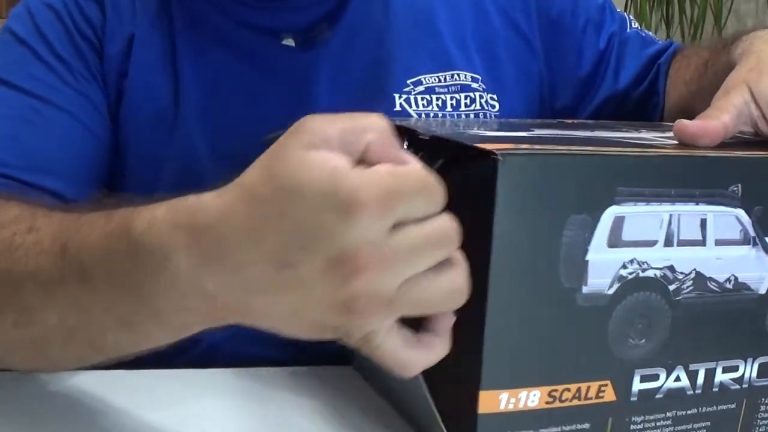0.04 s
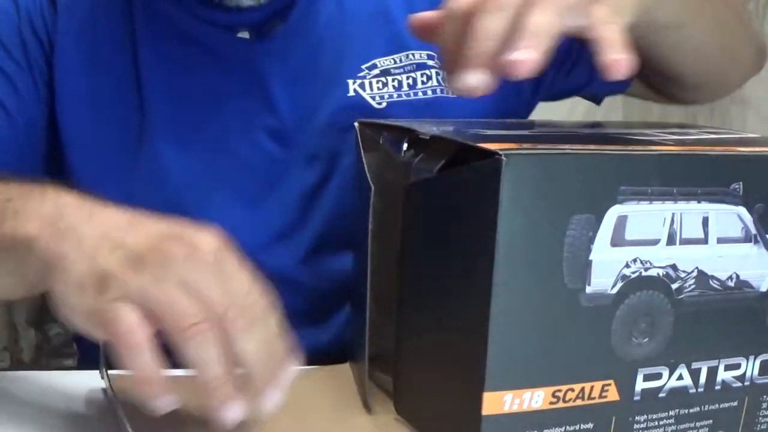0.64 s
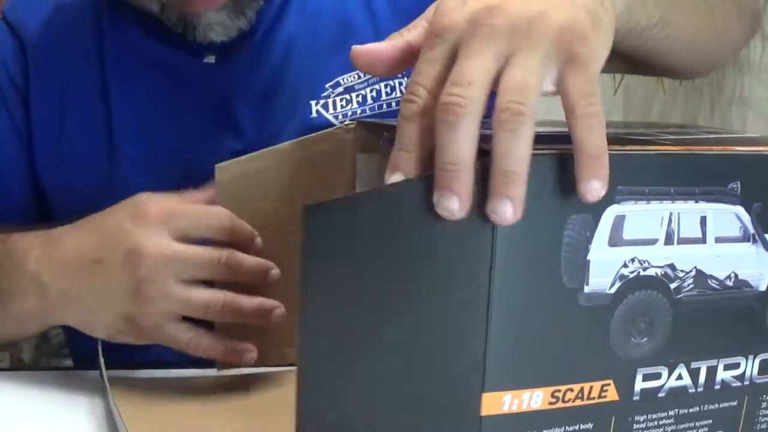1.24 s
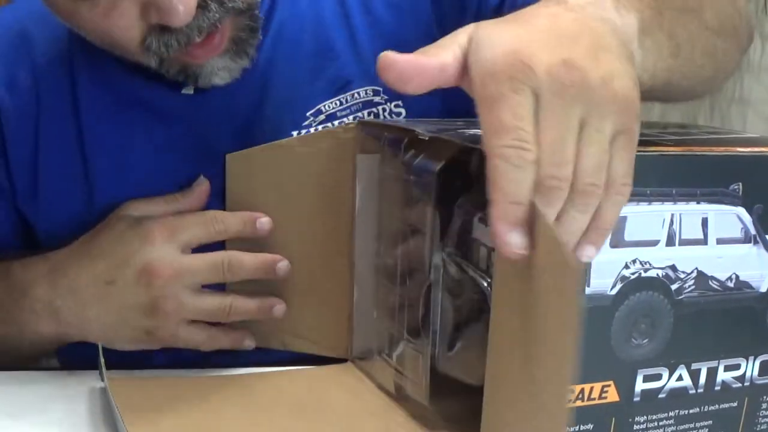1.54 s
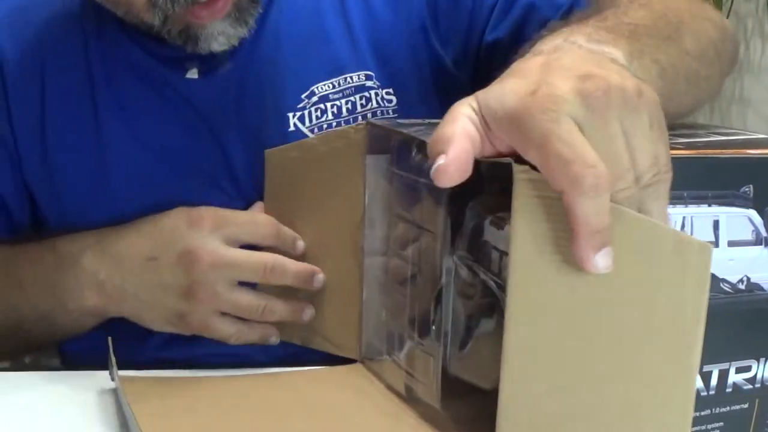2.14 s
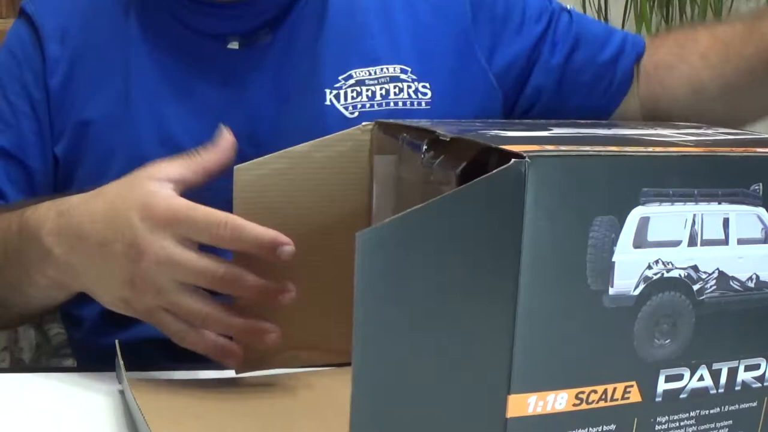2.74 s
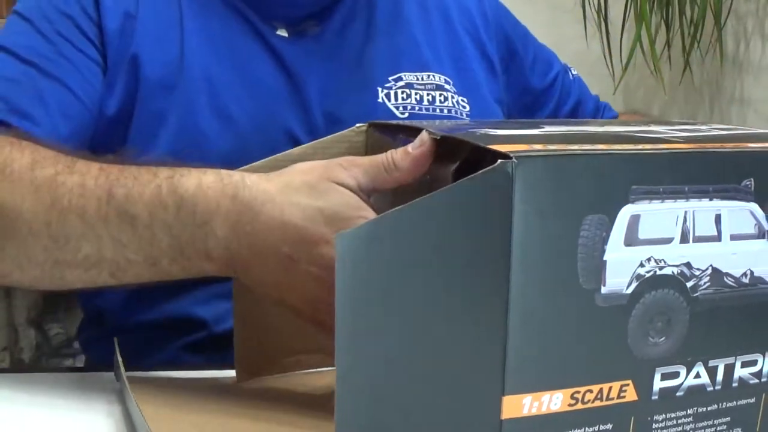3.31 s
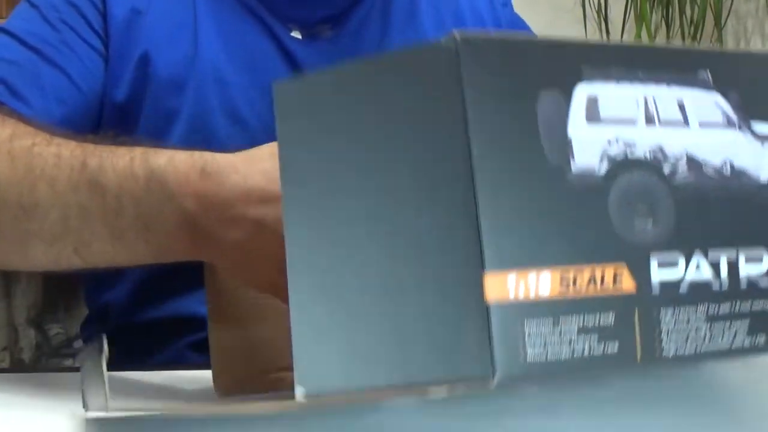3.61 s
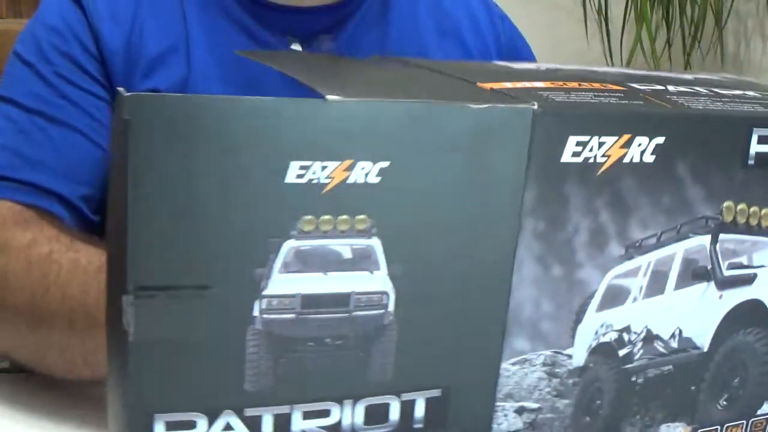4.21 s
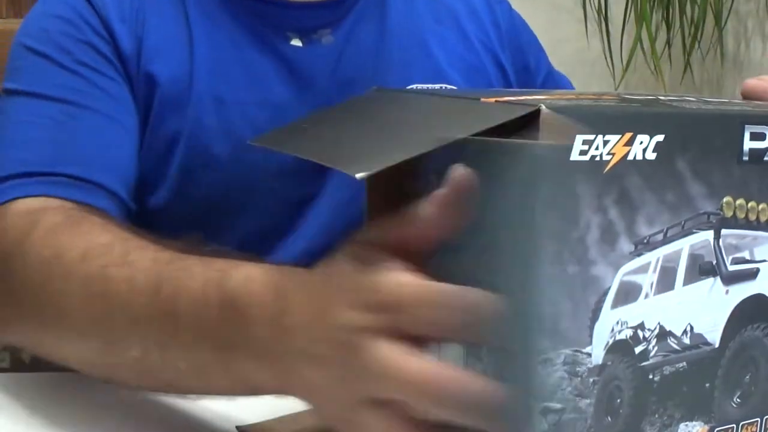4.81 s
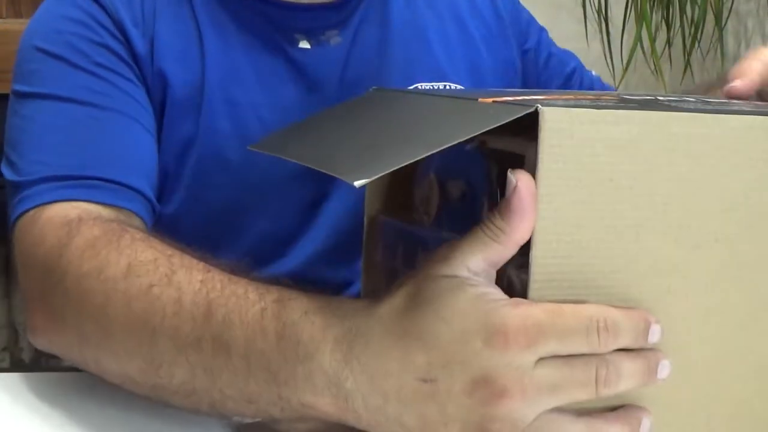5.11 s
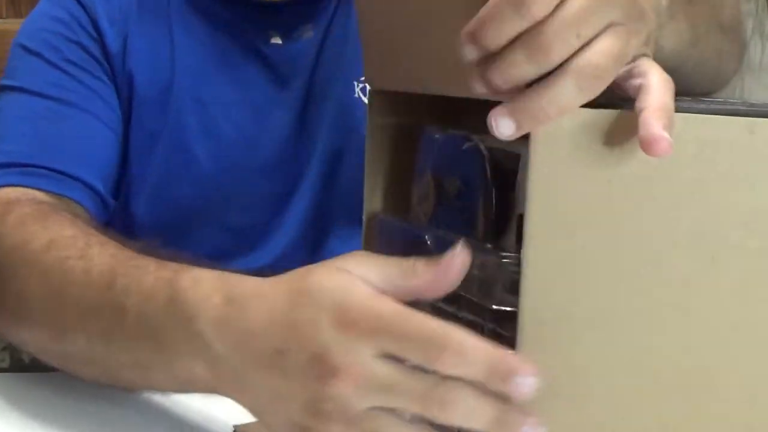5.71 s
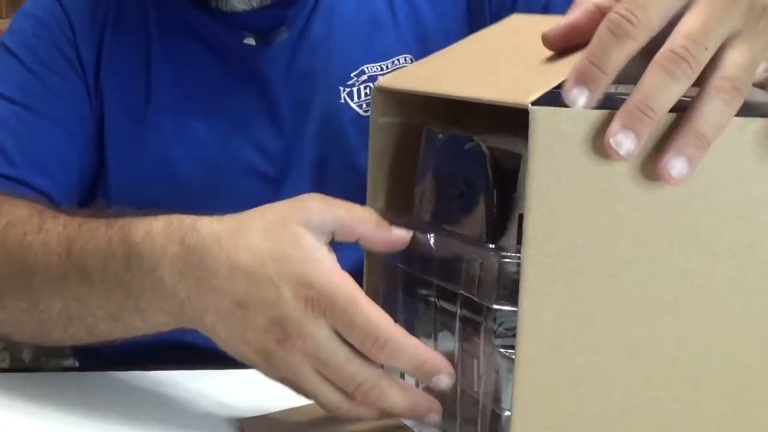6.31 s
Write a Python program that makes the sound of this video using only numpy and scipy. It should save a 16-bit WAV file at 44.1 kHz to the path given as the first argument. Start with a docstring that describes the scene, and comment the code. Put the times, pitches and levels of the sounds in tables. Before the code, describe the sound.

A cardboard box with a thin plastic tray inside is handled close to the microphone. It starts with a quick scrape of card and three sharp plastic snaps. A flap rasps and squeaks at about 0.4 seconds, and a hollow thump comes at 0.8, trailed by smaller bumps. From 1.3 to 3 seconds it is quieter, with hands sliding over card, light taps and a few clicks. A sharp knock lands at 3.1 seconds, then a squeaky scrape at 3.8 and scattered bumps as the box is turned. At 4.7 it hits the table with the loudest knock, followed by a hissing, squealing scrape until 5 seconds. Another flap rasps around 5.3. Bright plastic snaps stand out at 5.6 and 6.1, among soft knocks and rubbing. The room is small, with a short reverberation, faint air and a low steady hum.

```python
"""A quick scrape of card and a few sharp plastic snaps sound close by, over faint air and mains hum.
A cardboard box with a plastic tray inside is being opened and turned over on a table in a small room.
Friction makes the flaps rasp and squeal and the sliding skin hiss; bumps of the hands excite the
panels' damped modes, and the thin tray buckles in clicks. Near echoes and a short reverberation follow."""
import sys
import numpy as np
from scipy import signal
from scipy.fft import rfft, irfft, next_fast_len
from scipy.io import wavfile
from scipy.ndimage import map_coordinates

SR = 44100
rng = np.random.default_rng(int(sys.argv[2]) if len(sys.argv) > 2 else 0)


def transcribe(u):
    """Save the signal u as a 16-bit wav file named by the first command-line argument.

    u: samples, shape (n,) or (channels, n), limited to [-1, 1]; the rate is SR.
    q: integer samples, one column per channel.
    """
    v = np.clip(np.atleast_2d(u).T, -1, 1)
    q = np.round(v * 32767).astype(np.int16)
    wavfile.write(sys.argv[1], SR, q)


N = 280035
T = np.arange(N) / SR


def from_db(db):
    """Decibels to amplitude ratio."""
    return 10 ** (np.asarray(db) / 20)


def rms_one(x):
    """Normalisation to unit rms."""
    return x / np.sqrt(np.mean(x ** 2) + 1e-20)


def at_hz(points, hz):
    """Interpolation of a table on a log-frequency axis."""
    f, value = np.transpose(points)
    return np.interp(np.log(np.maximum(hz, 1)), np.log(f), value)


def colour(x, points, share=1):
    """Zero-phase filtering by rows of frequency_hz, gain_db; share scales the decibels."""
    size = next_fast_len(x.shape[-1] + SR // 10)
    hz = np.arange(size // 2 + 1) * SR / size
    return irfft(rfft(x, size) * from_db(share * at_hz(points, hz)), size)[..., :x.shape[-1]]


def band(x, low_hz, high_hz, order=2):
    """Causal band-pass filtering."""
    sos = signal.butter(order, [low_hz, min(high_hz, .45 * SR)], "band", fs=SR, output="sos")
    return signal.sosfilt(sos, x)


def add(track, start_s, sound):
    """Superposition of a sound on a track."""
    i = max(round(start_s * SR), 0)
    track[i:i + len(sound)] += sound[:N - i]


def fade(t, t60):
    """Exponential decay, 60 dB in t60 seconds."""
    return from_db(-60 * t / t60)


def drift(rate_hz, size):
    """Slow random modulation, bounded by -2 and 2."""
    return np.interp(T[:size] * rate_hz, np.arange(N // 100), 2 * np.tanh(rng.standard_normal(N // 100) / 2))


def stroke(t, length_s, rise_share, hold_share=0.3062):
    """Trapezoidal speed, 0-1; rise_share divides the time off top speed between rise and fall."""
    rise = np.clip(rise_share, .01, .99)
    shares = [0, rise * (1 - hold_share), hold_share, (1 - rise) * (1 - hold_share)]
    return np.interp(t, length_s * np.cumsum(shares), [0, 1, 1, 0])


def friction(size, grains_per_s, grain_share, judder_db, judder_hz):
    """Sliding friction: fibres catch and release in many tiny and a few large slips, pressed unevenly."""
    slips = (rng.random(size) < grains_per_s / SR) * rng.laplace(0, 1, size)
    force = np.sqrt(grain_share) * rms_one(slips) + np.sqrt(1 - grain_share) * rng.standard_normal(size)
    return rms_one(force * from_db(judder_db * drift(judder_hz, size)))


# spectrum of the still air: frequency_hz, gain_db
AIR_SPECTRUM = [(15, -55), (25, -10), (55, -6), (123, 3), (285, 1.5), (818, -12.5), (1520, -13.5),
                (3920, -19), (14800, -27.5), (16000, -39)]

def still_air(level_db=-52.5):
    """Ambient noise: a steady random signal, strongest in the low register."""
    return from_db(level_db) * rms_one(colour(rng.standard_normal(N), AIR_SPECTRUM))


def mains_hum(pitch_hz=120.5, rms_db=-59):
    """Simple harmonic motion: the mains give one steady, low tone."""
    return from_db(rms_db) * np.sqrt(2) * np.sin(2 * np.pi * pitch_hz * T)


# normal modes of the box: pitch_hz, level_db, t60_s
BOX_MODES = [(126.5, -15, 0.3), (172, -11, 0.12), (217, 6.5, 0.14), (264, 2.5, 0.2), (330, -4.5, 0.22),
             (407, 0, 0.068), (585, -1, 0.24), (600, 3, 0.12), (874, -1.5, 0.11), (976, 2.5, 0.017),
             (1185, 1.5, 0.01), (1454, -8.5, 0.11), (1850, 14, 0.0051), (2040, -1.5, 0.02)]

def box_ring(spread_db, detune=0.044):
    """Modal impulse response, peak 1: each contact point weights the modes and each grip shifts them."""
    hz, db, t60 = np.transpose(BOX_MODES)[:, :, None]
    t = T[:SR // 5]
    hz = hz * (1 + detune * rng.standard_normal(hz.shape))
    strength = from_db(db + spread_db * rng.standard_normal(hz.shape)) * rng.choice([-1, 1], hz.shape)
    ring = np.sum(strength * np.sin(2 * np.pi * hz * t) * fade(t, t60), axis=0)
    return ring / np.abs(ring).max()


# spectrum of an edge or skin sliding on card: frequency_hz, gain_db
HISS_SPECTRUM = [(300, -7.5), (900, -2), (2000, -2), (4200, -1.5), (5800, -2), (7500, 1.5), (9300, 3),
                 (11500, -6.5), (13500, -12.5), (16000, -18)]
# close modes of the card around a scraping edge: pitch_ratio, level_db
FLAP_MODES = [(.8, -4), (1.0, 0), (1.17, -2)]
# flaps on card and table: start_s, length_s, rise_share, pitch_hz, rasp_db, hiss_db, box_db, treble_db
FLAP_SCRAPES = [(0.0, 0.0583, 0, 2470, -45, -21.5, -32.5, 0), (0.038, 0.11, 0.09, 2390, -46, -56, -49, 0),
                (0.33, 0.23, 0.2, 2550, -45.5, -47, -42, 0),
                (0.37, 0.037, 0.41, 2600, -35, -29.5, -33.5, 4),
                (0.524, 0.11, 0.63, 2730, -40, -43, -43.5, 3), (0.917, 0.1, 0.07, 1070, -44, -50, -49, -2),
                (1.239, 0.11, 0.34, 980, -54, -48.5, -53, 8),
                (2.426, 0.06, 0.94, 2410, -40.5, -38.5, -35.5, 9),
                (3.096, 0.075, 0.56, 2750, -42.5, -43, -38.5, -2),
                (3.212, 0.048, 0.32, 2920, -41.5, -49, -52, -8),
                (3.348, 0.064, 0.1, 2900, -51, -42, -43, 2), (3.625, 0.058, 0.36, 2730, -54, -44, -50, -5),
                (3.776, 0.12, 0.02, 2900, -38.5, -41.5, -40, -3),
                (3.823, 0.15, .33, 2830, -35, -34, -45, -12),
                (4.675, 0.085, 0.03, 2790, -33.5, -35.5, -30.5, -1),
                (4.773, 0.22, 0.12, 2790, -37.5, -27.5, -40, 4),
                (4.789, 0.21, 0.51, 3200, -33, -24, -35, 0),
                (4.934, 0.078, 0.62, 2830, -31, -25, -32.5, -1),
                (5.312, 0.16, .25, 1930, -37.5, -38, -41, 0), (5.452, 0.11, 0.34, 2100, -40, -35, -53, -4),
                (5.561, 0.08, 0.01, 2200, -34.5, -38.5, -34, -3)]

def flap_scrapes(ribs_per_s=310, rib_depth=.55, slow_pitch_drop=.14, mode_ratio=1.08, skirt_ratio=1.65):
    """Forced vibration: one friction force hisses at the edge and drives the modes of flap and box."""
    out, t = np.zeros(N), T[:SR // 2]
    for start_s, length_s, rise_share, hz, rasp_db, hiss_db, box_db, treble_db in FLAP_SCRAPES:
        speed = stroke(t, length_s, rise_share)
        force = friction(len(t), grains_per_s=8300, grain_share=0.13, judder_db=1.07, judder_hz=87.6)
        ribs_crossed = np.cumsum(ribs_per_s * speed * (1 + .5 * drift(203.4, len(t)))) / SR
        force *= 1 + rib_depth * speed * np.cos(2 * np.pi * ribs_crossed)
        modes = 0
        for ratio, db in FLAP_MODES:
            mode = band(force, hz * ratio / mode_ratio, hz * ratio * mode_ratio, order=1)
            modes += from_db(db + 4 * drift(89.7, len(t))) * mode   # the edge feeds each mode unevenly
        rasp = rms_one(band(modes + from_db(-15) * force, hz / skirt_ratio, hz * skirt_ratio))
        glide = 1 - slow_pitch_drop * (1 - speed)   # a slower edge rasps lower
        rasp = from_db(rasp_db) * map_coordinates(rasp, [np.cumsum(glide)], order=3)
        hiss = colour(colour(force, HISS_SPECTRUM), [(9500, 0), (13000, treble_db)])
        held_ring = box_ring(spread_db=1.5) * fade(T[:SR // 5], t60=0.035)   # damped by the hand
        box = band(signal.fftconvolve(force, held_ring)[:len(t)], low_hz=515, high_hz=4830, order=1)
        scrape = rasp + from_db(hiss_db) * rms_one(hiss) + from_db(box_db) * rms_one(box)
        add(out, start_s, speed * scrape)
    return out


# spectra of the panels' rumble and the card's rustle: frequency_hz, gain_db
RUMBLE_SPECTRUM = [(25, -38), (55, -9), (100, -9), (190, 1.5), (270, 7.5), (450, -4), (700, -5),
                   (1200, -9.5), (3000, -67)]
RUSTLE_SPECTRUM = [(400, -1.5), (800, 3), (1300, -1), (2000, 1.5), (3300, -1), (5000, -11), (8000, -38)]
# hands sliding on the box: start_s, length_s, panel_db, skin_db
HAND_RUBS = [(0.004, 0.16, -37.5, -41), (0.153, 0.13, -42, -45), (0.254, 0.23, -49, -48.5),
             (0.881, 0.16, -33, -51), (0.984, 0.49, -47, -54), (1.306, 0.45, -72, -48),
             (1.576, 0.18, -46, -53), (1.852, 0.34, -52, -45.5), (2.026, 0.15, -42, -48),
             (2.103, 0.25, -47, -42.5), (2.324, 0.18, -44, -50), (3.156, 0.56, -42.5, -56),
             (3.464, 0.14, -72, -46.5), (3.544, 0.63, -44, -64), (3.91, 0.22, -46, -49),
             (4.072, 0.12, -34.5, -44.5), (4.107, 0.45, -46, -47.5), (4.373, 0.098, -33.5, -51),
             (4.461, 0.21, -39, -50.5), (4.677, .1, -29.5, -50), (4.955, 0.19, -43.5, -41),
             (5.032, 0.31, -53.5, -47.5), (5.52, 0.18, -39, -39.5), (5.633, 0.26, -42, -44.5),
             (5.844, .24, -39.5, -43.5), (6.042, 0.13, -41, -36.5), (6.086, 0.5, -48.5, -43.5)]

def hand_rubs():
    """Friction noise grows with sliding speed: panels rumble, card rustles and skin hisses on the print."""
    gains = np.zeros((3, N))
    for start_s, length_s, panel_db, skin_db in HAND_RUBS:
        speed = stroke(T - start_s, length_s, rise_share=0.33, hold_share=0.27)
        card_db = skin_db + 0.36 * (panel_db - skin_db)
        gains += np.outer(from_db([panel_db + 1.5, card_db - 1.5, skin_db]), speed)
    rumble = friction(N, grains_per_s=160, grain_share=0.4, judder_db=4, judder_hz=45)
    rustle = friction(N, grains_per_s=570, grain_share=0.14, judder_db=6, judder_hz=100)
    hiss = friction(N, grains_per_s=1100, grain_share=0.15, judder_db=2, judder_hz=140)
    layers = colour(rumble, RUMBLE_SPECTRUM), colour(rustle, RUSTLE_SPECTRUM), colour(hiss, HISS_SPECTRUM)
    return sum(gain * rms_one(layer) for gain, layer in zip(gains, layers))


# sharp snaps of the plastic tray, and cracks as the box is knocked: start_s, level_db, centre_hz
SNAPS_AND_CRACKS = [(0.019, -8, 9000), (0.031, -14, 8370), (0.062, -11.5, 9700), (0.4937, -17.5, 11000),
                    (0.512, -18, 2510), (0.8055, -21, 7100), (0.816, -24, 6250), (1.098, -23, 8500),
                    (2.074, -20, 8160), (2.312, -27.5, 7240), (2.346, -26, 5040), (3.143, -23, 9500),
                    (3.1502, -8, 1160), (4.670, -6.5, 1680), (4.697, -22, 2970), (4.709, -12, 3300),
                    (3.215, -26, 3300), (3.236, -22, 2700), (3.244, -26, 3200), (3.429, -23.5, 9400),
                    (4.965, -18, 6800), (4.974, -10, 9500), (5.5698, -4, 9800), (5.5703, -8.5, 2130),
                    (5.577, -4.5, 9000), (5.675, -22, 2930), (5.798, -24, 3420), (6.073, -17, 8000),
                    (6.1041, -6.5, 9300)]

def snaps_and_cracks(jolt_hz=5500, band_ratio=1.56, gain_db=-8):
    """Transients: a snap or crack excites dense modes that die fast. Each knock also makes the tray tick."""
    out, t = np.zeros(N), T[:SR // 10]
    jolts = [(start_s, tick_db, jolt_hz) for start_s, _, _, _, tick_db, _ in BOX_KNOCKS]
    envelope = fade(t, t60=0.0028) + from_db(-8) * fade(t, t60=0.044)   # the click, then a brief ring
    for start_s, db, hz in SNAPS_AND_CRACKS + jolts:
        force = rng.standard_normal(len(t))
        burst = rms_one(band(force, hz / band_ratio, hz * band_ratio)) + from_db(-13) * force
        add(out, start_s, from_db(db + gain_db) * burst * envelope)
    return band(out, low_hz=510, high_hz=12300)


# blows on the box: start_s, thump_db, pitch_hz, clack_db, tick_db, damping_t60_s
BOX_KNOCKS = [(0.059, -21, 190, -31, -30, 0.094), (0.776, -17.5, 212, -25, -24.5, 0.2),
              (0.806, -8.5, 208.4, -16.5, -18.5, 0.091), (0.845, -22, 215, -27, -29, 0.078),
              (0.924, -18.5, 290, -21, -26, 0.037), (1.031, -24, 314, -19.5, -22.5, 0.038),
              (1.044, -22.5, 303, -46, -42, 0.084), (1.073, -32, 262, -36, -25.5, 0.065),
              (1.098, -29, 277, -25.5, -30, .06), (1.176, -39, 302, -28.5, -28, .06),
              (1.267, -43, 274, -33, -35, 0.086), (1.996, -28, 340, -28, -33, 0.047),
              (2.043, -25, 390, -30, -32, 0.064), (2.052, -23.5, 440, -25.5, -40, 0.027),
              (2.089, -38, 423, -23.5, -35, 0.052), (2.358, -35, 398, -34, -40, 0.056),
              (2.391, -30, 407, -37, -44, 0.064), (2.405, -35, 363, -27, -41, 0.045),
              (2.481, -38, 330, -23, -28, 0.086), (3.094, -33.5, 236, -35, -33, 0.083),
              (3.1499, -13.5, 286.6, -12.5, -20, 0.074), (3.273, -28.5, 310, -33, -46, 0.06),
              (3.424, -28.5, 276, -31, -31, 0.068), (3.624, -22, 291, -31, -43, 0.045),
              (3.78, -24, 246, -27, -24, 0.22), (3.988, -19, 255, -36, -39, 0.047),
              (4.071, -26, 246, -33, -28, 0.096), (4.100, -25, 247, -21, -19, 0.15),
              (4.409, -25, 238, -24, -27, 0.11), (4.538, -24.5, 283, -29, -26.5, 0.084),
              (4.566, -20, 220, -52, -45, 0.063), (4.668, -9.5, 251, -15, -21, 0.091),
              (4.674, -9.5, 326, -9, -20, 0.092), (4.706, -19.5, 246, -17, -23, 0.074),
              (5.027, -25, 260, -29, -27, 0.084), (5.529, -27.5, 218, -45, -33, 0.067),
              (5.570, -37, 260, -40, -37, 0.048), (5.586, -19.5, 221, -21, -20, 0.16),
              (5.847, -28.5, 292, -29, -22, 0.068), (5.908, -26.5, 292, -49, -35, 0.13),
              (5.931, -23.5, 275, -25, -37, 0.22), (5.949, -21.5, 263, -21, -23, 0.12),
              (6.069, -26, 191, -36, -29, 0.18), (6.117, -36, 199, -20, -30, 0.073),
              (6.34, -31.5, 302, -25, -25, 0.11)]

def box_knocks(panel_t60=0.16, give_s=0.0006):
    """Impact excitation: the contact cracks like paper; panel and box ring until the hand damps them."""
    out, t = np.zeros(N), T[:SR // 5]
    panel_modes = [(1, 0), (1.85, -8), (2.9, -13)]   # pitch_ratio, level_db
    for start_s, thump_db, hz, clack_db, _, damping_t60 in BOX_KNOCKS:
        modes = sum(from_db(db) * np.sin(2 * np.pi * hz * ratio * t) for ratio, db in panel_modes)
        panel = modes * fade(t, panel_t60) * (1 - np.exp(-t / give_s))
        fibres = friction(len(t), grains_per_s=1900, grain_share=0.3, judder_db=5.5, judder_hz=100)
        crack = rms_one(band(fibres, low_hz=690, high_hz=2200)) * fade(t, t60=0.024)
        ring = from_db(thump_db) * panel + from_db(clack_db - 1) * box_ring(spread_db=5, detune=0.039)
        add(out, start_s, ring * fade(t, damping_t60) + from_db(clack_db - 7) * crack)
    return band(out, low_hz=131, high_hz=11800)   # light panels radiate little bass


# squealing card edges: start_s, length_s, rise_share, pitch_hz, glide_hz_per_s, width_hz, level_db
EDGE_SQUEALS = [(0.373, 0.03, 0.36, 2460, 2000, 480, -26.5), (0.376, 0.016, 0.2, 3350, 2000, 260, -30),
                (0.373, 0.038, 0.04, 7650, 0, 1100, -29), (0.553, 0.063, 0.86, 2800, 4008, 400, -42.5),
                (0.584, 0.042, 0.5, 2380, 5020, 230, -38), (3.228, 0.032, 0.4, 2084, 0, 300, -44),
                (3.839, 0.11, 0.11, 2360, -2000, 516, -33), (3.839, 0.11, 0.05, 3200, -2, 710, -37),
                (3.825, .11, 0.6, 12300, 0, 1400, -44), (4.796, 0.19, 0.12, 2325, -1000, 600, -31.5),
                (4.80, 0.16, 0.4, 13500, 2, 1600, -36), (4.833, 0.084, .5, 3800, 0.5, 1200, -29),
                (4.873, 0.1, 0.44, 575, -3, 89.5, -34), (4.94, .075, 0.4, 1080, 0, 350, -35),
                (5.308, 0.14, 0.45, 1993, -500, 650, -37.5), (5.335, 0.078, 0.4, 855, -1000, 395, -40.5),
                (5.413, 0.17, 0.6, 1280, -2000, 278, -43)]

def edge_squeals():
    """Stick-slip: uneven slips feed one resonance, a hoarse band whose centre glides along the stroke."""
    out, t = np.zeros(N), T[:SR // 4]
    for start_s, length_s, rise_share, hz, glide_hz_per_s, width_hz, db in EDGE_SQUEALS:
        low_pass = signal.butter(2, width_hz / 2, fs=SR, output="sos")
        slips = signal.sosfilt(low_pass, rng.standard_normal((2, len(t))))
        phase = 2 * np.pi * np.cumsum(hz + glide_hz_per_s * t) / SR
        tone = slips[0] * np.cos(phase) + slips[1] * np.sin(phase)
        add(out, start_s, from_db(db) * stroke(t, length_s, rise_share) * rms_one(tone))
    return out


# the box landing on the table: start_s, level_db, pitch_hz, t60_s
LANDINGS = [(0.808, -25, 109, 0.14), (4.671, -18, 89, 0.054), (5.577, -31, 123.6, 0.23)]

def table_thuds():
    """Damped free vibration: the weight of the box excites one low mode as it lands."""
    out, t = np.zeros(N), T[:SR // 5]
    for start_s, db, hz, t60 in LANDINGS:
        add(out, start_s, from_db(db) * np.sin(2 * np.pi * hz * t) * fade(t, t60))
    return out


# reflections from near surfaces: delay_s, level_db
NEAR_ECHOES = [(.0031, -29), (.0074, -20.5), (0.0133, -20)]

def near_echoes(direct):
    """Early reflection: each near surface returns a delayed, weaker copy."""
    return sum(from_db(db) * np.interp(T - delay_s, T, direct, left=0) for delay_s, db in NEAR_ECHOES)


# reverberation time: frequency_hz, t60_s (negative at the top: that octave swells to a faint late echo)
REVERB_TIMES = [(100, 0.35), (300, 0), (1000, 0.62), (3000, 0.5), (8000, 0.35), (15000, -0.3)]
# spectrum of the reverberation: frequency_hz, gain_db
REVERB_SPECTRUM = [(60, -19.5), (250, -13), (1000, -9), (3000, -10), (8000, -12), (15000, -25)]

def reverberation(direct, first_wall_s=0.015, build_s=0.011):
    """Diffuse field: dense reflections form a 1 s noise tail with its own envelope in each octave."""
    t, tail = T[:SR], 0
    edges_hz = 40 * 2 ** np.arange(10)
    onset = np.clip((t - first_wall_s) / build_s, 0, 1)
    for low, high in zip(edges_hz, edges_hz[1:]):
        shape = onset * fade(t, at_hz(REVERB_TIMES, np.sqrt(low * high)))
        tail += band(rng.standard_normal(len(t)), low, high) * shape / np.sqrt(np.sum(shape ** 2))
    return signal.fftconvolve(direct, colour(tail, REVERB_SPECTRUM))[:N]


# stereo width of the handling: frequency_hz, side_gain_db
PANEL_WIDTH = [(40, -16), (120, -26), (250, -26), (600, -16), (2000, -14), (4000, -11), (8000, -14),
               (14000, -20)]

def panel_spread(handling):
    """Decorrelation: wide panels reach the two capsules by unequal paths, giving a side signal."""
    paths = rng.standard_normal(SR // 40) * fade(T[:SR // 40], t60=0.047)
    spread = signal.fftconvolve(handling, paths / np.linalg.norm(paths))[:N]
    return colour(spread, PANEL_WIDTH)


# stereo width of the still air: frequency_hz, side_gain_db
AMBIENT_WIDTH = [(60, -91), (300, -16.5), (1500, -4), (4000, -8.5), (9000, -15), (14000, -50)]
# channel balance: frequency_hz, left_minus_right_db
BALANCE = [(60, 1.7), (250, .9), (500, -.8), (2000, -1.6), (8000, -.6), (14000, -.2)]

def scene(room_side_db=-5):
    """Superposition in mid-side stereo: the close box, its reflections, still air and hum."""
    direct = box_knocks() + table_thuds() + snaps_and_cracks()
    direct += flap_scrapes() + edge_squeals() + hand_rubs()
    handling = direct + near_echoes(direct) + reverberation(direct)
    room_side = from_db(room_side_db) * band(reverberation(direct), low_hz=45, high_hz=13000, order=1)
    mid = handling + still_air() + mains_hum()
    side = colour(still_air(), AMBIENT_WIDTH) + panel_spread(handling) + room_side
    return np.array([colour(mid + sign * side, BALANCE, share=sign / 2) for sign in (1, -1)])


def record(dry):
    """Band limiting: a steep low-pass removes the treble above 15.9 kHz."""
    return signal.sosfilt(signal.ellip(10, .1, 80, 15900, fs=SR, output="sos"), dry)


dry = scene()
out = record(dry)
transcribe(out)
```